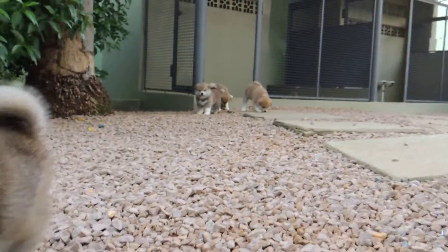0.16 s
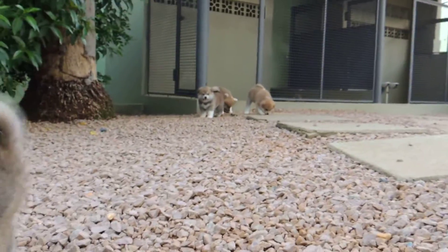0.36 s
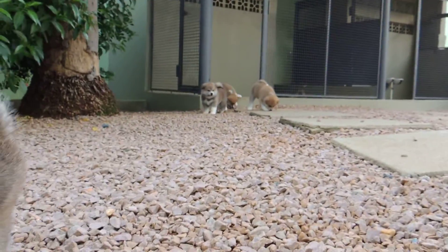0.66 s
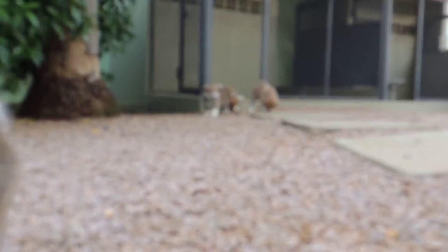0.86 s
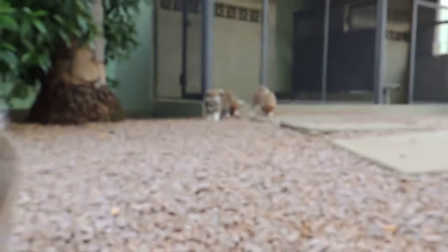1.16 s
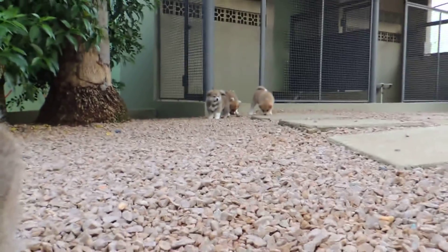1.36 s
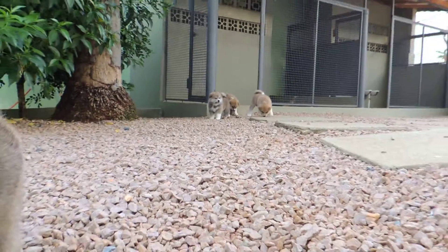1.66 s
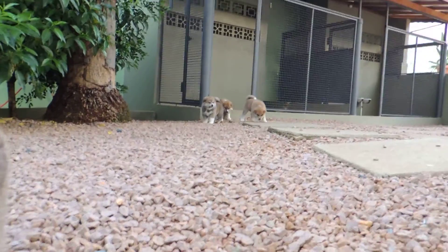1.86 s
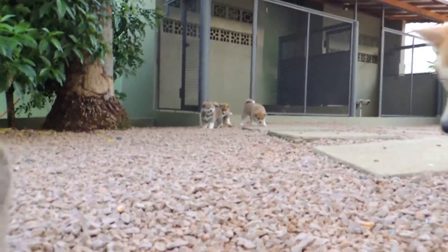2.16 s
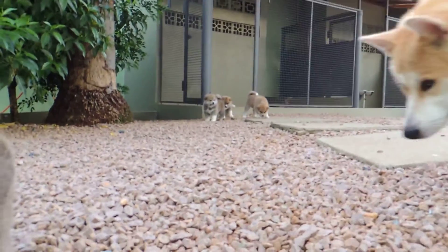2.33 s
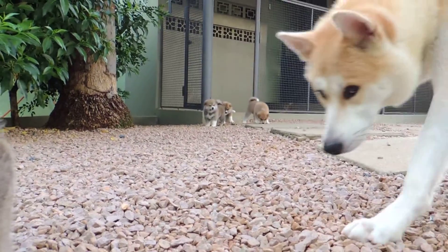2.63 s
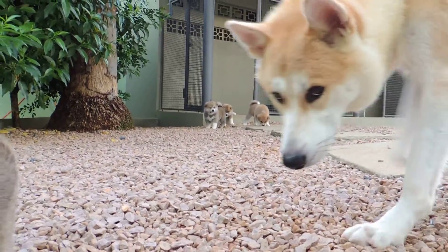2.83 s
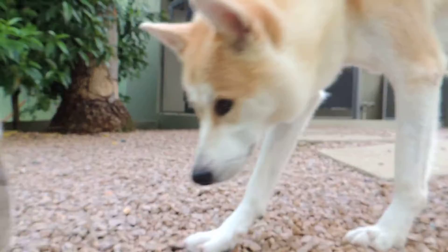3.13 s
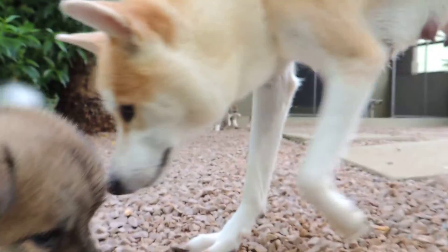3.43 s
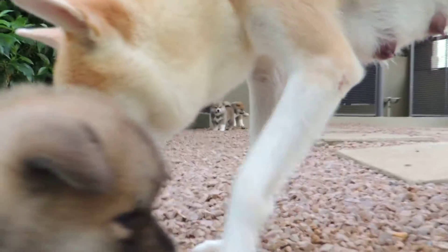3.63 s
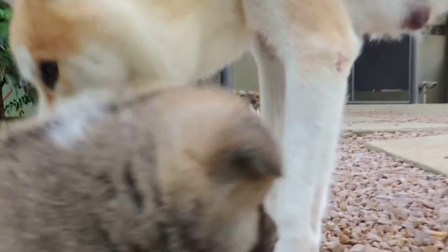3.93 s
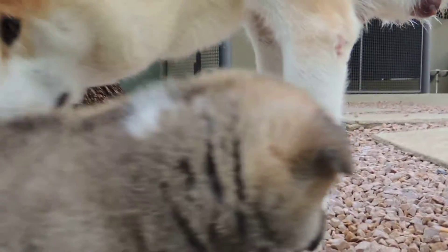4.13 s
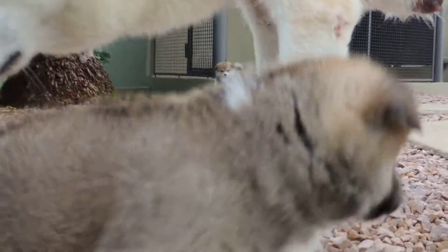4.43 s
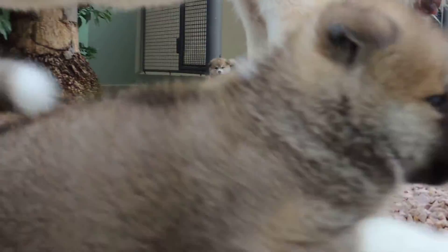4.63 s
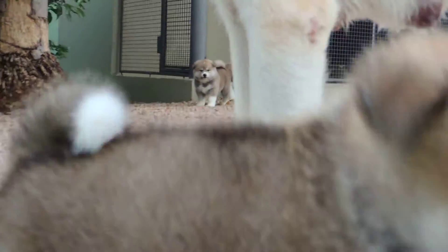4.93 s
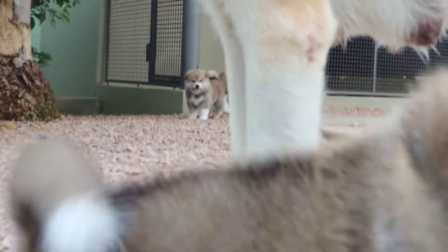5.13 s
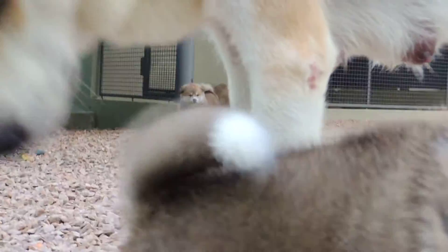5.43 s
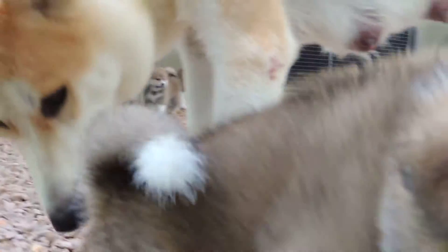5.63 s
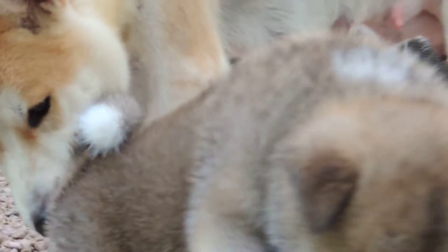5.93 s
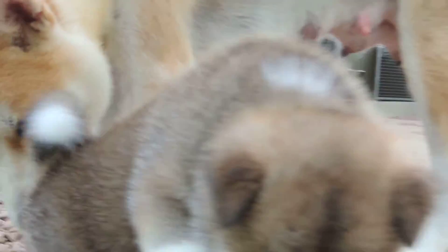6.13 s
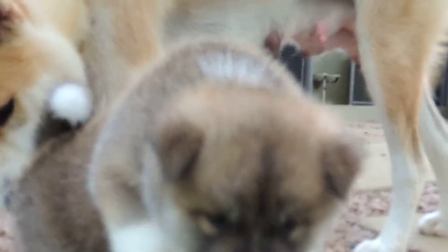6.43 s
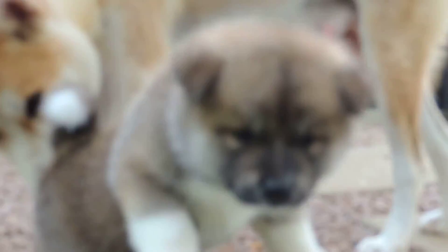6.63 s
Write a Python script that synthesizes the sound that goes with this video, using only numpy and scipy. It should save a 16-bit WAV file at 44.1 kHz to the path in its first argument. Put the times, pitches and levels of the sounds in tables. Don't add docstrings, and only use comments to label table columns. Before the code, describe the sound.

Close gravel crunches, snaps and a hard stone knock under dogs' paws; small birds chirp in pairs of notes, with faint sniffing and distant traffic.

```python
import sys
import numpy as np
from scipy import signal
from scipy.fft import rfft, irfft, next_fast_len
from scipy.io import wavfile
from scipy.ndimage import uniform_filter1d, map_coordinates

SR = 44100
rng = np.random.default_rng(int(sys.argv[2]) if len(sys.argv) > 2 else 0)


def natural_amplitude(level_db):
    exponent = np.asarray(level_db, float) / 20
    return 10 ** exponent


def store_wav(level_fs):
    pcm = np.round(np.clip(np.atleast_2d(level_fs), -1, 1) * 32767)
    wavfile.write(sys.argv[1], SR, pcm.T.astype(np.int16))


N = 298998

# [f/Hz, width/Hz, level/dB]
STONE_BANDS = [
    (8500, 17500, 3),
    (2470, 4270, 13.5),
    (703, 1340, 18),
]
# [f/Hz, width/Hz, level/dB]
KNOCK_BANDS = [
    (5430, 9500, 4.5),
    (2650, 3060, 12.5),
    (1120, 2400, 22),
]
CRUNCHING = dict(rise_share=.4, bend=1.4, spiky_db=4.2, grain_rate=2600)
CLICKING = dict(rise_share=.008, bend=.9, spiky_db=2.5, grain_rate=4000)
KNOCKING = dict(rise_share=.03, bend=1.8, spiky_db=2, grain_rate=3000)
# [t/s, peak level/dB, stone rel/dB, thud rel/dB, fade/s]
PUPPY_STEPS = [(.405, -35.5, -34, -31, 0.098), (1.512, -34, -18, -47, 0.084),
               (1.5356, -36.5, -14, -16, 0.13), (1.8731, -43, -20, -21, 0.046),
               (3.2925, -27.5, -11, -24, 0.033), (3.5966, -31.5, -11.5, -23, 0.065),
               (3.7688, -31, -9, -15.5, 0.18), (3.8004, -34, -6, -31, 0.083),
               (3.9913, -35.5, -10, -10, 0.029), (4.3345, -32, -7.5, -16.5, 0.12),
               (4.3572, -35.5, -27, -18, 0.15), (4.4883, -35.5, -6, -10.5, 0.051),
               (5.072, -32.5, -12, -22, 0.039), (5.15, -32.5, -7.5, -16, 0.02),
               (5.1906, -36.5, -9.5, -21, 0.072), (5.4994, -40, -12, -13, .082),
               (5.6441, -37, -7, -4, 0.021), (5.7713, -35, -21, -23, 0.084), (5.9743, -37, -16, -10, 0.12)]
MOTHER_STEPS = [(.4492, -30.5, -11, -19, 0.049), (1.6052, -20.5, -16, -19, 0.074),
                (1.6173, -27, -14.5, -24, 0.16), (2.0837, -23, -14.5, -15, 0.072),
                (2.1244, -32.5, -21, -26, 0.14), (2.226, -32, -30, -20, 0.074),
                (2.5681, -29, -15, -22, 0.02), (2.654, -22, -9, -16, 0.082),
                (2.6714, -20, -20, -19.5, 0.038), (2.832, -33, -10.5, -19, 0.039),
                (3.1987, -26.5, -15, -20.5, 0.085), (3.3565, -22, -19, -38, 0.1),
                (3.4134, -26.5, -11, -15.5, 0.065), (3.4775, -23, -18, -36, 0.049),
                (4.3894, -38, -7, -31, 0.09), (4.848, -31.5, -23, -20, 0.023),
                (5.093, -31, -37, -14, 0.032)]
# [t/s, peak level/dB, left-right/dB]
CHIPS = [(0.412, -31, 4), (0.4167, -33, 5), (0.45, -27, -2), (0.718, -35.5, 4), (2.2306, -28.5, -3.5),
         (2.4094, -36, 1.5), (2.7738, -28.5, -2), (2.8036, -40, 1), (3.3174, -33, -5), (3.6247, -33, 1.5),
         (3.7752, -31, -1.5), (3.887, -36, -1), (4.3645, -28, -1), (4.4395, -41, -3), (4.4687, -33.5, 0.5),
         (4.5166, -38, 6), (5.3406, -43, -1.5)]
# [t/s, stone peak level/dB, grit rel/dB, thud rel/dB, left-right/dB]
PEBBLES = [(0.854, -40, -29, -10, 4.5), (2.0194, -51.5, 13, 14, -2), (2.0773, -35, -7.5, -19, 1.5),
           (2.0838, -25.5, 2, -25, -4), (2.3044, -38, -16, 1, 1), (2.3277, -40.5, -9, 0, 2),
           (2.3794, -40.5, -7, 2, 1), (2.9566, -38.5, 4, -13, -5), (3.2135, -36, 2, -6, 7.5),
           (3.659, -47, 1, 8, -3), (3.9044, -39, -20, -0.5, 0.5), (3.9414, -47, 13, 1, -1),
           (4.802, -43.5, 6, -5, 3), (4.876, -41, -4, -14, 2.5), (5.5944, -49, 0, 7, -2),
           (6.103, -50, 14, 8, 1), (6.309, -42, -13, -7, 4)]
# [t/s, peak level/dB, stone rel/dB, thud rel/dB, fade/s]
KNOCKS = [
    (1.8335, -9.5, -5.5, -20, 0.0094),
    (2.5225, -22, -7, -26, 0.0066),
    (6.4617, -34, 0.5, -25, 0.0061),
]
# [f/Hz, level/dB]
BIG_STONE = [(1237, -11), (2100, -4.5), (2795, 1), (3480, -1.5), (5330, -2), (6135, -1), (7475, 2),
             (8280, 1.5), (11160, -9)]
FLAT_STONE = [(2060, 1.5), (3530, -5), (4440, 1), (5450, 1), (6830, -11), (8400, -1), (10400, -5),
              (11600, 1)]
ROUND_STONE = [(1500, -3), (2770, 0), (3890, 6.5), (5200, -1), (6420, 4), (7800, -3), (9030, -15),
               (11600, -18)]
# [level over the knock/dB, ring/s, bend of the fade]
STONE_RINGS = [
    (-6.5, 0.0028, 1.2),
    (-5.5, 0.0014, 0.73),
    (1.5, 0.0011, 0.81),
]
# [t/s, peak level/dB, f/Hz, left-right/dB]
SPLINTERS = [(1.61, -25, 8000, -10), (1.6125, -26, 11000, -5), (1.6176, -27, 8500, -4),
             (1.624, -13.5, 10500, -6), (1.627, -18, 9500, -8), (1.6305, -26, 9500, -1),
             (1.6332, -22, 9500, -9), (1.642, -19, 11000, 4), (2.0899, -24, 8500, -7),
             (2.093, -14, 8100, -7), (2.096, -19, 8500, -2), (2.6473, -23, 10000, -3),
             (2.6622, -24, 8500, -4), (2.665, -23, 8500, 1.5), (2.6693, -27, 10500, -8),
             (2.6721, -28, 8500, 6), (2.6781, -20, 11500, -2), (2.6804, -20.5, 7500, -11),
             (2.6825, -44, 11000, -1), (3.2092, -20, 6000, 2.5), (3.2158, -20.5, 7400, 3.5),
             (3.2201, -29, 8500, 4), (3.2936, -26, 11500, 5), (3.2942, -16, 12100, 1.5),
             (3.2992, -31, 11500, 5), (3.3418, -22, 12000, 8), (3.3616, -18, 8000, -2),
             (3.3649, -18, 11000, -3), (3.366, -11.5, 11000, -7.5), (3.3702, -13, 9500, -5),
             (3.3754, -18, 10500, -6), (3.3783, -25, 10000, 4), (3.3834, -26, 10500, -7),
             (3.479, -20, 12500, -6), (3.4815, -16, 12000, -3), (3.4858, -13, 9500, -4.5),
             (3.4935, -27, 10000, -2.5), (3.7855, -29, 10500, 7), (3.8034, -23, 7500, -1.5),
             (3.8082, -19, 6500, -1), (3.8144, -25, 10000, -4), (3.8163, -25, 9000, 2.5),
             (3.9685, -30, 12500, -3), (3.9925, -35, 12000, 1)]

# [share of length, low pitch ratio, high pitch ratio, low level/dB, high level/dB]
CHEE = [(0, .77, 1.0, -20, -50), (.2, .85, 1.06, -10, -30), (.32, .95, 1.14, -3, -5),
        (.45, 1, 1.135, 0, -3), (.7, .965, 1.085, 0, -4), (.86, .88, .98, -2, -12), (1, .72, .86, -10, -45)]
RUP = [(0, .76, .92, -12, -30), (.17, .85, .98, -3, -7), (.5, .97, 1.08, 0, -3), (.66, 1, 1.13, -1, -4),
       (.78, .92, 1.13, -3, -30), (1, .7, 1.1, -11, -50)]
ARCH = [(0, .76, .9, -12, -40), (.17, .8, .93, -3, -12), (.43, .99, 1.08, -2, -2), (.68, 1, 1.08, -3, -2),
        (.8, .93, 1.0, 0, -10), (1, .74, .85, -8, -40)]
TSEE = [(0, .96, 1.1, -14, -30), (.2, 1.005, 1.12, 0, -3), (.55, .99, 1.11, -4, -6), (.8, .97, 1.1, -2, -8),
        (1, .93, 1.08, -14, -30)]
# [t/s, length/s, top f/Hz, direct level/dB, high voice rel/dB]
FENCE_CHEES = [(.755, 0.081, 5140, -52, 3.5), (1.47, 0.073, 5210, -42, -5), (2.182, .069, 5120, -45.5, -7),
               (5.752, 0.086, 5260, -51, -8)]
FENCE_RUPS = [(.862, 0.044, 4300, -52.5, 6.5), (1.578, 0.037, 4420, -50, 9.5),
              (2.288, 0.043, 4300, -48.5, 5), (5.853, .052, 4240, -50, 5), (6.312, 0.045, 4170, -57.5, -1)]
SHRILL_CHEE = [(6.207, .068, 5150, -47.5, 0)]
# [t/s, length/s, top f/Hz, direct level/dB, echo level/dB]
ROOF_CHEES = [(.268, 0.064, 4990, -38, -37), (1.012, 0.075, 5150, -37.5, -38), (2.76, .06, 5140, -48, -44),
              (3.493, 0.063, 5130, -48.5, -41), (3.905, 0.066, 4290, -59, -51),
              (4.592, 0.055, 5170, -43.5, -43.5), (5.545, 0.076, 4950, -57, -45)]
ROOF_RUPS = [(.371, 0.042, 4410, -35, -36.5), (1.113, 0.05, 4540, -37.5, -36),
             (1.24, 0.051, 4370, -60, -47.5), (1.29, 0.058, 3870, -61, -53), (2.885, 0.035, 4370, -52, -50),
             (2.99, 0.046, 4180, -69, -52.5), (3.595, 0.048, 4340, -54, -49), (4.22, 0.038, 3746, -59, -46),
             (4.685, 0.05, 4230, -58, -51.5), (5.64, 0.053, 4440, -51, -46), (6.589, 0.033, 3960, -60, -49)]
TSEES = [(2.818, 0.067, 5150, -44, -53), (4.16, 0.06, 4620, -57, -63), (4.645, 0.054, 4940, -43.5, -53),
         (6.529, 0.059, 4610, -52.5, -58)]
# (t60/s, first arrival/s)
WALLS = (.33, .009)

# [t/s, level/dB]
HUFF = [(2.33, -57), (2.4, -55), (2.48, -55.5), (2.56, -46.5), (2.65, -53.5), (2.72, -59)]
# [f/Hz, width/Hz, level/dB]
MUZZLE = [(670, 70, 2.5), (790, 110, -12), (910, 120, -1), (275, 140, -2), (450, 150, -11)]
# [t/s, level/dB, f/Hz]
SNIFF = [(5.38, -56, 9600), (5.55, -62, 10000), (5.77, -52, 10300), (5.9, -51, 12200), (6.05, -51, 11300),
         (6.2, -77, 10000)]
# [f/Hz, width/Hz]
NOSTRILS = [(9500, 1800), (11000, 1500), (12500, 1500)]
# [t/s, length/s, first f/Hz, last f/Hz, level/dB]
WHISTLES = [(4.057, .035, 10900, 11600, -73), (4.1, .05, 11500, 11100, -84),
            (4.157, 0.12, 11700, 11400, -82), (4.26, 0.078, 14000, 13500, -72),
            (4.6, 0.067, 13000, 12400, -72), (4.753, .045, 13300, 12500, -73),
            (4.8, 0.034, 12450, 12150, -65), (6.575, .085, 10900, 14200, -73),
            (6.74, 0.019, 12400, 12600, -65)]

# [t/s, level/dB]
RESTLESS = [(0, -54.5), (.42, -50), (.8, -61.5), (1.4, -55), (1.68, -50), (2.0, -55), (2.45, -60),
            (2.7, -47.5), (2.96, -55.5), (3.42, -46), (3.7, -55), (4.2, -55.5), (5.08, -54.5),
            (5.32, -60.5), (5.46, -56), (5.9, -50), (6.45, -60.5), (6.78, -52.5)]
# [f/Hz, density level/dB]
SHUFFLE = [(3500, -23), (6000, 4), (8000, 1.5), (11000, 0.5), (14000, 1), (18000, -8.5)]
SOFT_HISS = [(1200, -27), (1900, -11.5), (3000, 0), (4500, 0), (6500, -9.5), (9000, -13)]
ROAD = [(450, -27), (750, -2), (1120, -1), (1230, -0.5), (1340, -3), (2200, -6), (3200, -21)]
TOWN = [(22, -17), (30, -18), (50, -7), (75, -6), (144, -7), (168, -8.5), (268, -6.5), (445, -10.5),
        (470, -11), (700, -11), (910, -21), (1540, -120)]
# [t/s, level/dB]
TRAFFIC = [(0, -57), (.45, -58), (.85, -60.5), (1.6, -58), (2.38, -60.5), (2.55, -59), (3, -59.5),
           (3.9, -57.5), (4.6, -57.5), (5.06, -57), (5.28, -59.5), (5.5, -55), (5.76, -52), (6.14, -55),
           (6.38, -60.5), (6.78, -58.5)]
# (f/Hz, width/Hz, level/dB)
FAN = (276, 29, -66.5)
# (f/Hz, width/Hz, level of its noisy part/dB)
DRONE = (38, 12, -7)
# [t/s, level/dB]
IDLING = [(0, -51), (1, -56), (2, -54.5), (3.3, -59), (4.65, -53.5), (5.32, -59), (5.6, -51.5),
          (6.25, -53.5), (6.45, -56), (6.78, -58)]
# [f/Hz, pitch unsteadiness, level/dB, nearest t/s, heard for/s]
ENGINES = [(67.3, .03, -62, 0.75, 1.9), (86.6, 0.0196, -64, 3.2, 0.26), (84.8, 0.0207, -61, 5, .3),
           (151, 0.0193, -68.5, 1.7, 2.6), (65.3, 0.0402, -61, 5.6, 0.47)]
# [f/Hz, likeness 0-1]
ALIKE = [(40, 0.84), (120, 0.75), (400, 0.77), (1200, 0.42), (2500, 0.39), (14000, 0.018)]

LAG_PER_DB = 2
PUPPY_PAN_DB, MOTHER_PAN_DB, KNOCK_PAN_DB, RUMBLE_PAN_DB = 4.5, -0.9, -2, 1
CHIP_FADE_S, CHIP_SNAP_DB, PEBBLE_FADE_S = 0.02, -1, .013
CHIP_STONE_DB, CHIP_THUD_DB, CHIP_DARKENS = -24, -16, 0.33
RING_RISE_S = 0.00037
SPLINTER_WIDTH, SPLINTER_FADE_S, SPLINTER_ALIKE = 0.61, 0.007, 0.54
SNAP = 2.5
QUAVER, FLUTTER_DB = .009, 2.2
ROOF_HIGH_DB, TSEE_HIGH_DB = 0, -20
OVERTONES_DB, SHRILL_DB, SUM_TONE_DB = -15, -2, -5.5
FENCE_ECHO_DB, ECHO_TRIM_DB, STONE_ECHO_DB = -1.5, 3.5, -23
SOFT_HISS_DB, SOFT_HISS_FOLLOWS = -60.5, 0.6
TOWN_DB, TOWN_FOLLOWS = -55, 0.57
CEILING, STEADY_TOP_HZ = .8, 14230


def unit(x):
    return x / np.sqrt(np.mean(x ** 2) + 1e-20)


def along(points, hz):
    f, v = np.transpose(points)
    return np.interp(np.log(hz + 1), np.log(f + 1), v)


def curves(rows):
    s, *cols = np.transpose(rows)
    return [np.interp(np.arange(N) / SR, s, c) for c in cols]


def wobble(rate):
    knots = rng.standard_normal(int(N * rate / SR) + 4)
    return map_coordinates(knots, [np.arange(N) * rate / SR])


def filtered(x, response):
    m = next_fast_len(N + 8192)
    return irfft(rfft(x, m) * response(np.fft.rfftfreq(m, 1 / SR)), m)[..., :N]


def resonance(f, hz, width):
    return 1j * f * width / (hz * hz - f * f + 1j * f * width)


def balance(pan_db):
    return natural_amplitude([[pan_db / 2], [-pan_db / 2]])


def pair_noise(size, alike):
    common, *own = rng.standard_normal((3, size))
    return np.sqrt(alike) * common + np.sqrt(1 - alike) * np.array(own)


def rush(gain, patchy_db):
    z = signal.stft(rng.standard_normal((2, N)), nperseg=512)[2]
    field = rng.standard_normal(z.shape[1:])
    field = uniform_filter1d(uniform_filter1d(field, 8, 0), 10, 1)
    pair = signal.istft(z * natural_amplitude(patchy_db * unit(field)), nperseg=512)[1][:, :N]

    def mid_side(hz):
        turn = np.arccos(np.clip(along(ALIKE, hz), -1, 1)) / 2
        return gain(hz) * [np.cos(turn), np.sin(turn)]

    mid, side = filtered(pair, mid_side)
    return unit(np.array([np.roll(mid + side, shift=5), mid - side]))


def gravel(rows, bands, alike, rise_share, bend, spiky_db, grain_rate):
    size = round(1.4 * SR * max(row[-1] for row in rows))
    t = np.arange(size) / SR
    drive = np.zeros((3, 2, N + size))
    for s, db, stone_db, thud_db, pan_db, fade in rows:
        knots = rng.standard_normal(size // 4)
        slips = natural_amplitude(spiky_db * np.interp(t * grain_rate, np.arange(len(knots)), knots))
        u = t / max(fade, .003)
        shape = (1 - np.exp(-u / rise_share)) * natural_amplitude(-60 * u ** bend)
        burst = pair_noise(size, alike) * slips * shape
        burst *= np.linalg.norm(shape) / np.linalg.norm(burst, axis=1, keepdims=True) / shape.max()
        for ear, sign in enumerate((1, -1)):
            start = round(s * SR - sign * pan_db * LAG_PER_DB / 2)
            levels = natural_amplitude(db + sign * pan_db / 2 + np.array([0, stone_db, thud_db]))
            drive[:, ear, start:start + size] += levels[:, None] * burst[ear]
    return sum(natural_amplitude(db) * filtered(x[:, :N], lambda f: resonance(f, hz, width) ** 2)
               for x, (hz, width, db) in zip(drive, bands))


def paw_steps():
    rows = [(*step[:4], PUPPY_PAN_DB, step[4]) for step in PUPPY_STEPS]
    rows += [(*step[:4], MOTHER_PAN_DB, step[4]) for step in MOTHER_STEPS]
    return natural_amplitude(-7.0) * gravel(rows, STONE_BANDS, alike=0.27, **CRUNCHING)


def stone_clicks():
    rows = []
    for s, db, pan in CHIPS:
        body_db = -CHIP_DARKENS * (db + 30)
        rows.append((s, db + CHIP_SNAP_DB, CHIP_STONE_DB + body_db, CHIP_THUD_DB + body_db, pan, CHIP_FADE_S))
    for s, db, grit, thud, pan in PEBBLES:
        rows.append((s, db + grit, -grit, thud - grit, pan, PEBBLE_FADE_S))
    return natural_amplitude(-1.0) * gravel(rows, STONE_BANDS, alike=0.34, **CLICKING)


def stone_knocks():
    rows = [(*knock[:4], KNOCK_PAN_DB, knock[4]) for knock in KNOCKS]
    return natural_amplitude(-6.0) * gravel(rows, KNOCK_BANDS, alike=0.19, **KNOCKING)


def stone_rings():
    t, out = np.arange(SR // 50) / SR, np.zeros((2, N))
    stones = (BIG_STONE, FLAT_STONE, ROUND_STONE)
    for (s, peak_db, *_), modes, (ring_db, ring_s, bend) in zip(KNOCKS, stones, STONE_RINGS):
        ring = sum(natural_amplitude(db) * np.sin(2 * np.pi * (hz * t + rng.random((2, 1)) / 6)) for hz, db in modes)
        shape = (1 - np.exp(-t / RING_RISE_S)) * np.exp(-(t / ring_s) ** bend)
        out[:, round(s * SR):][:, :len(t)] = natural_amplitude(peak_db + ring_db) * ring * shape
    return out * balance(KNOCK_PAN_DB)


def splinters():
    size = 512
    t, f = np.arange(size) / SR, np.fft.rfftfreq(size, 1 / SR)
    out = np.zeros((2, N))
    for s, db, hz, pan_db in SPLINTERS:
        scrape = pair_noise(size, SPLINTER_ALIKE) + SNAP * (t == 0)
        scrape = scrape * natural_amplitude(-60 * t / SPLINTER_FADE_S)
        snap = irfft(rfft(scrape) * resonance(f, hz, SPLINTER_WIDTH * hz) ** 2, size)
        for ear, sign in enumerate((1, -1)):
            start = round(s * SR - sign * pan_db * LAG_PER_DB / 2)
            level = natural_amplitude(db + sign * pan_db / 2)
            out[ear, start:start + size] += level * snap[ear] / np.abs(snap[ear]).max()
    return out


def yard_echo(x):
    t60, first = WALLS
    t = np.arange(SR // 3) / SR
    tail = rng.standard_normal((2, len(t))) * natural_amplitude(-60 * t / t60) * (t > first)
    return signal.fftconvolve(x[None], tail / np.linalg.norm(tail[0]), axes=1)


def syllables(template, rows, overtone_db, flutter):
    share, *cols = np.transpose(template)
    out = np.zeros((2, N + SR))
    quaver = 1 + QUAVER * np.array([wobble(150), wobble(150)])
    for s, length, hz, db, high_db, echo_db in rows:
        u = np.arange(round(length * SR)) / (length * SR)
        start = round(s * SR)
        end = start + len(u)
        low, high, low_db, high_shape_db = [uniform_filter1d(np.interp(u, share, c), size=160) for c in cols]
        a, b = 2 * np.pi * hz * np.cumsum([low, high] * quaver[:, start:end], axis=1) / SR
        one, two = natural_amplitude(low_db), natural_amplitude(high_shape_db + high_db)
        sum_tone = np.sqrt(one * two) * np.sin(a + b)
        overtones = one * np.sin(2 * a) + natural_amplitude(SUM_TONE_DB) * (sum_tone + two * np.sin(2 * b))
        voice = one * np.sin(a) + two * np.sin(b) + natural_amplitude(overtone_db) * overtones
        echo = yard_echo(voice)
        out[:, start:end] += natural_amplitude(db + 2.0) * voice * flutter[:, start:end]
        out[:, start:start + echo.shape[1]] += natural_amplitude(echo_db + ECHO_TRIM_DB) * echo
    return out[:, :N]


def sparrows():
    def fence(rows):
        return [(*row, row[3] + FENCE_ECHO_DB) for row in rows]

    def roof(rows, high_db):
        return [(*row[:4], high_db, row[4]) for row in rows]

    flutter = natural_amplitude(FLUTTER_DB * np.array([wobble(110), wobble(140)]))
    songs = [(ARCH, fence(FENCE_CHEES), OVERTONES_DB),
             (RUP, fence(FENCE_RUPS), OVERTONES_DB),
             (CHEE, fence(SHRILL_CHEE), SHRILL_DB),
             (CHEE, roof(ROOF_CHEES, ROOF_HIGH_DB), OVERTONES_DB),
             (RUP, roof(ROOF_RUPS, ROOF_HIGH_DB), OVERTONES_DB),
             (TSEE, roof(TSEES, TSEE_HIGH_DB), OVERTONES_DB)]
    return sum(syllables(*song, flutter) for song in songs)


def huff():
    rows = [(HUFF[0][0] - .04, -95)] + list(HUFF) + [(HUFF[-1][0] + 0.044, -95)]

    def muzzle(f):
        return sum(natural_amplitude(db) * np.abs(resonance(f, hz, width)) ** 2 for hz, width, db in MUZZLE)

    return natural_amplitude(curves(rows)[0] + 2.0) * rush(muzzle, patchy_db=1.5)


def sniff():
    first, last = SNIFF[0], SNIFF[-1]
    rows = [(first[0] - .05, -95, first[2])] + list(SNIFF) + [(last[0] + 0.054, -95, last[2])]
    db, pitch = curves(rows)
    air = rush(np.ones_like, patchy_db=1.0)
    hiss = np.zeros((2, N))
    for hz, width in NOSTRILS:
        band = unit(filtered(air, lambda f: resonance(f, hz, width) ** 2))
        hiss += np.exp(-((pitch - hz) / width) ** 2) * band
    return natural_amplitude(db) * hiss


def nose_whistles():
    out = np.zeros(N)
    for s, length, first_hz, last_hz, db in WHISTLES:
        u = np.arange(round(length * SR)) / (length * SR)
        turns = np.cumsum(first_hz + (last_hz - first_hz) * u) / SR
        out[round(s * SR):][:len(u)] += natural_amplitude(db + 11.5) * np.sin(np.pi * u) ** .4 * np.sin(2 * np.pi * turns)
    return out * natural_amplitude(3.3 * wobble(90)) * balance(5)


def shuffle_and_soft_hiss():
    shuffle_db = curves(RESTLESS)[0]
    soft_hiss_db = SOFT_HISS_DB + SOFT_HISS_FOLLOWS * (shuffle_db - shuffle_db.mean())
    soft_hiss = rush(lambda f: natural_amplitude(along(SOFT_HISS, f)), patchy_db=3.0)
    grit = natural_amplitude(0.77 * wobble(25) + 1.5 * wobble(400))
    shuffle = unit(grit * rush(lambda f: natural_amplitude(along(SHUFFLE, f)), patchy_db=3.0))
    return natural_amplitude(shuffle_db + 2.0) * shuffle + natural_amplitude(soft_hiss_db + 9.0 + 0.17 * wobble(24)) * soft_hiss


def engines():
    hz, width, noise_db = DRONE
    tone = np.sin(2 * np.pi * np.cumsum(hz * (1 + 0.0155 * wobble(2.7))) / SR)
    noise = rush(lambda f: np.abs(resonance(f, hz, width)), patchy_db=-1.7)
    out = natural_amplitude(curves(IDLING)[0]) * unit(tone + natural_amplitude(noise_db) * noise)
    t = np.arange(N) / SR
    for lorry_hz, drift, db, s, span in ENGINES:
        swell = natural_amplitude(db + 3.2 * wobble(4.06)) * np.exp(-((t - s) / span) ** 2)
        out = out + swell * np.sin(2 * np.pi * np.cumsum(lorry_hz * (1 + drift * wobble(5))) / SR)
    return out


def town_and_road():
    road_db = curves(TRAFFIC)[0]
    town_db = TOWN_DB + TOWN_FOLLOWS * (road_db - road_db.mean())
    town = natural_amplitude(town_db + 2.0) * rush(lambda f: natural_amplitude(along(TOWN, f)), patchy_db=0.45)
    road = natural_amplitude(road_db + 5.5) * rush(lambda f: natural_amplitude(along(ROAD, f)), patchy_db=1.4)
    fan_hz, fan_width, fan_db = FAN
    fan = natural_amplitude(fan_db) * rush(lambda f: np.abs(resonance(f, fan_hz, fan_width)) ** 2, patchy_db=1.0)
    return (fan + town + engines()) * balance(RUMBLE_PAN_DB) + road


def scene():
    stones = paw_steps() + stone_clicks() + stone_knocks() + stone_rings() + splinters()
    stone_echo = natural_amplitude(STONE_ECHO_DB) * yard_echo(stones.mean(axis=0))[:, :N]
    dogs = huff() + sniff() + nose_whistles()
    return stones + stone_echo + sparrows() + dogs + shuffle_and_soft_hiss() + town_and_road()


def top_cut(x):
    return signal.sosfilt(signal.butter(12, 16280, fs=SR, output="sos"), x)


def record(dry):
    dry = dry / (1 + np.abs(dry / CEILING) ** 4) ** (1 / 4)
    top = filtered(dry, lambda hz: hz > STEADY_TOP_HZ)
    power = np.sum(top ** 2, axis=0)
    sudden = uniform_filter1d(power, size=100) > 6 * uniform_filter1d(power, size=1500)
    gate = np.clip(uniform_filter1d(sudden * 1., size=300) * 2, 0, 1)
    kept = filtered(gate * top, lambda hz: (hz > STEADY_TOP_HZ) * natural_amplitude(-1 - 11 * (hz - STEADY_TOP_HZ) / 1000))
    return top_cut(dry - top + kept)


dry = scene()
out = record(dry)
store_wav(out)
```